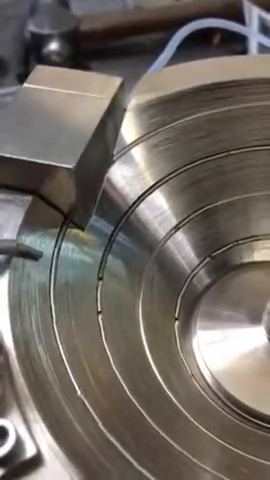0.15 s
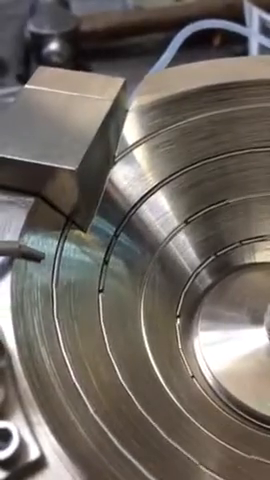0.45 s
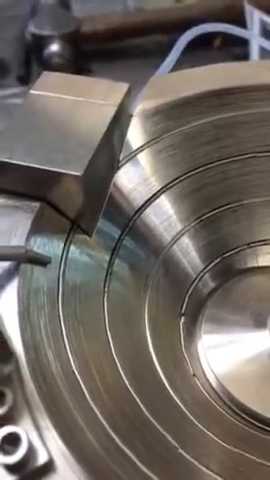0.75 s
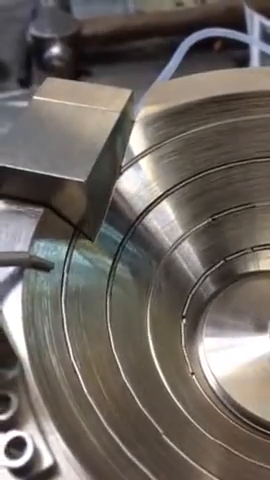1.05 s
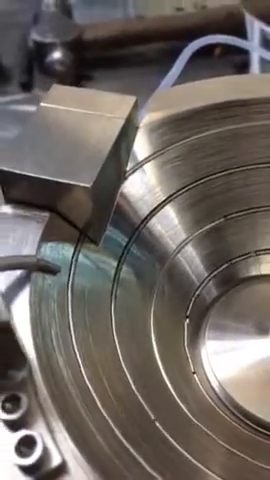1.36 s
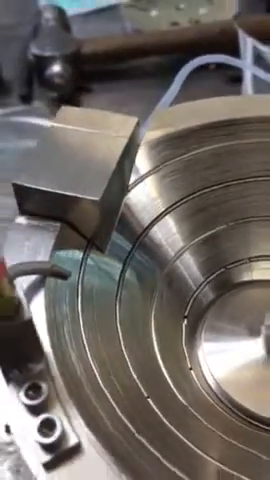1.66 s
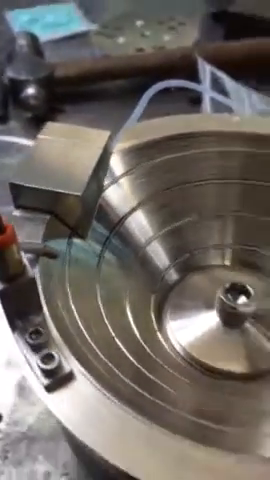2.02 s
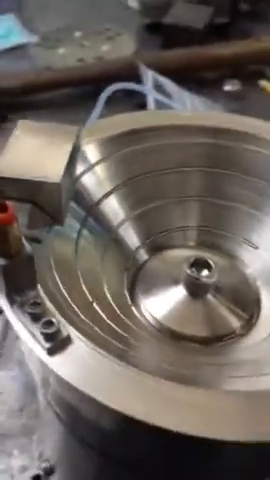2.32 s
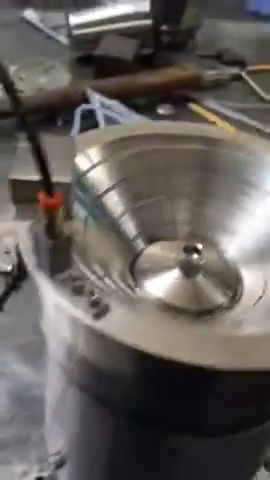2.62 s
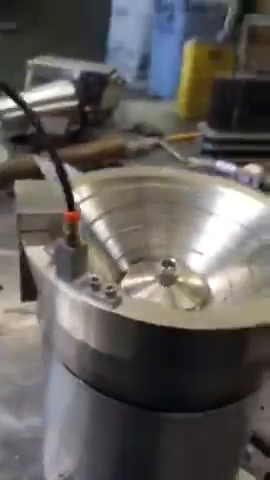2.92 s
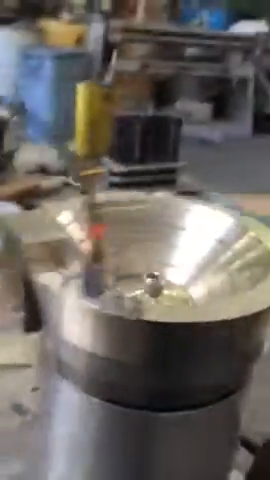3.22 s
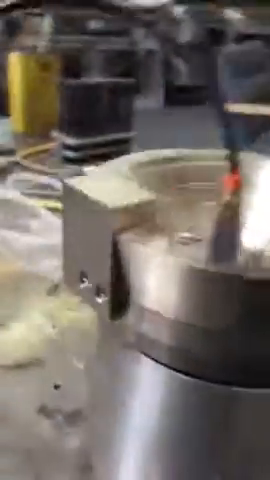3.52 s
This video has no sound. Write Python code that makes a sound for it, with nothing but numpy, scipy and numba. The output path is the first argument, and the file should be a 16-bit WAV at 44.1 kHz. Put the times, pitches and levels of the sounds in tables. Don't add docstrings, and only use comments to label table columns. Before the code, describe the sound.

Bright compressed-air hiss runs throughout over a low mains hum from a vibrating steel bowl; the handheld phone starts close, backs away and turns, with faint knocks and a shoe scuff near three seconds.

```python
import sys
import numpy as np
from scipy import signal
from scipy.fft import rfft, irfft, next_fast_len
from scipy.io import wavfile
from scipy.ndimage import uniform_filter1d, map_coordinates
from numba import njit

SR = 44100
rng = np.random.default_rng(int(sys.argv[2]) if len(sys.argv) > 2 else 0)


def master(y):
    cut = np.clip(np.atleast_2d(y).T, -1, 1)
    pcm = np.round(cut * 32767)
    wavfile.write(sys.argv[1], SR, pcm.astype(np.int16))


def decibels_to_gain(level_db):
    exponent = np.asarray(level_db, float) / 20
    return 10 ** exponent


N = 162288

# (centre [Hz], width [Hz], level [dB])
FACING_MODES = [(2250, 260, -19.5), (2740, 770, -19), (3160, 360, -18), (4324, 940, -10.5),
                (5390, 780, -9.5), (5960, 890, -14.5), (7420, 1470, -6), (8700, 570, -8.5), (9560, 670, -4),
                (10320, 310, -7), (11820, 1270, 2), (13170, 1750, -1), (14460, 1050, 1), (15400, 1500, -7)]
# (centre [Hz], width [Hz], level [dB])
BACKED_MODES = [(2640, 490, -14), (3330, 810, -16.5), (4000, 620, -26), (5240, 930, -8), (6300, 2400, -14),
                (7400, 1900, -13), (8580, 530, -5.5), (9430, 840, -5), (10140, 420, -12), (11740, 1050, 0),
                (12630, 1760, 0.5), (14200, 890, 1), (15400, 1300, -6)]
# (centre [Hz], width [Hz], level [dB])
SIDE_MODES = [(2070, 1800, -21), (2890, 890, -11), (4150, 1220, -5.5), (5200, 1040, -2), (6090, 500, -7.5),
              (7600, 1660, -3), (8700, 1200, -4), (9600, 600, 0.5), (10400, 610, 0), (11260, 370, -3),
              (12400, 1270, -0.5), (13900, 1400, -5.5), (15200, 1800, -8.5)]
# (time [s], facing jet [dB], backed jet [dB], side jet [dB])
PHONE_PATH = [(0, -35.5, -51, -51), (1.6, -36.5, -40.5, -53), (1.9, -37.5, -41.5, -60),
              (2.2, -43, -40.5, -47), (2.45, -44, -38.5, -49.5), (2.75, -57, -38.5, -47.5),
              (2.95, -57, -40, -44), (3.05, -65, -42.5, -44), (3.14, -65, -57, -42.5), (3.3, -71, -47, -43),
              (3.5, -69, -50, -43), (3.68, -61.5, -64, -42)]
# (time [s], lag [ms])
FLANK_LAG = [(1.8, 0.4), (2.5, 0.49), (3.0, 0.57), (3.35, 0.945), (3.68, 0.78)]
# (time [s], centre [Hz], depth [0-1])
RIM_DIP = [(0, 3490, 0.77), (1.6, 3520, .8), (1.85, 3620, .75), (2.0, 3750, .6), (2.15, 3850, 0.6),
           (2.3, 3950, 0.45), (2.55, 3900, .2), (2.7, 3600, 0.4), (3.0, 3450, .4), (3.45, 3050, 0.3),
           (3.68, 3300, 0.1)]
# (time [s], centre [Hz], depth [0-1])
BENCH_DIP = [(1.7, 4350, 0.02), (1.9, 4280, 0.25), (2.2, 4430, 0.7), (2.6, 4570, 0.25), (3.2, 4620, 0.34),
             (3.68, 4930, 0.7)]
# (time [s], centre [Hz], depth [0-1])
SHADE_DIP = [(2.7, 14300, 0), (2.9, 14200, .3), (3.06, 14600, .5), (3.35, 14600, .45), (3.46, 15400, 0.3),
             (3.68, 15000, .5)]
# (time [s], centre [Hz], depth [0-1])
HOLDER_DIP = [(2.2, 7900, 0.03), (2.5, 7900, 0.4), (2.8, 7600, 0.1), (3.1, 7700, 0.3), (3.36, 8700, 0.46),
              (3.43, 9200, 0), (3.52, 12400, .2), (3.68, 12300, 0.6)]
# (time [s], centre [Hz], depth [0-1])
LIP_DIP = [(1.6, 6350, 0), (1.95, 6420, .55), (2.2, 6600, .45), (2.35, 6900, .2), (2.6, 6300, 0),
           (2.75, 6400, .35), (3.1, 6900, .35), (3.4, 6500, .3), (3.68, 6600, .2)]
# (time [s], centre [Hz], depth [1, under 0 lifts])
HOLLOW_LIFT = [(2.85, 3800, 0.021), (3.05, 3950, -0.23), (3.25, 4200, -0.36), (3.4, 4450, -0.41),
               (3.52, 4200, 0), (3.6, 4000, .4), (3.68, 4000, .4)]
# (time [s], centre [Hz], depth [1, under 0 lifts])
EDGE_DIP = [(2.85, 13800, 0), (3.03, 13800, .7), (3.17, 13700, .75), (3.25, 13900, .2), (3.4, 13250, .6),
            (3.5, 14000, .1), (3.56, 14500, .6), (3.68, 14800, .7)]
# (time [s], centre [Hz], depth [1, under 0 lifts])
WALL_GLANCE = [(2.75, 11900, 0), (2.9, 12100, -.3), (3.05, 12300, -.2), (3.2, 12000, 0.15), (3.3, 11200, 0),
               (3.4, 11100, -.6), (3.5, 11200, -.3), (3.6, 11300, 0)]
# (multiple of mains [1], level [dB rms], loss per dB of distance loss [dB])
DRIVE_LINES = [(1.014, -77.5, -1.5), (1.995, -45.5, 1.3), (4.01, -61, 0.2), (6, -62, 3), (7.95, -76.5, 5),
               (9.97, -77.5, 1.5), (12, -90, -4.5), (13.9, -75.5, 4.5), (16, -85, 3), (18, -78, 4.5),
               (21.9, -81, -1.5), (22.93, -85, 5), (23.44, -83, -1.5)]
# (time [s], level [dB])
DRIVE_FALL = [(0, -1), (1.5, -0.5), (2.3, -1.25), (2.9, -1.1), (3.2, -2.1), (3.68, -2.5)]
# (frequency [Hz], level [dB per Hz])
RUMBLE = [(22, 7), (45, -10.5), (100, 2.5), (200, -10), (450, -12.5), (900, -15), (1400, -13), (2200, -6)]
# (time [s], level [dB], pitch [Hz], t60 [s])
KNOCK_EVENTS = [
    (2.32, -56, 1307, 0.12),
    (2.61, -52, 1770, 0.08),
    (2.61, -60, 1270, 0.056),
    (2.62, -54, 2250, .06),
    (2.722, -55, 374, 0.1),
    (2.725, -62, 1230, .12),
    (3.495, -62, 454, 0.066),
    (3.53, -60, 1290, .04),
    (3.65, -62, 890, 0.07),
]
# (time [s], level [dB], centre [Hz], t60 [s])
SCUFF_EVENTS = [
    (2.605, -67, 1400, 0.16),
    (2.716, -71.5, 705, 0.29),
    (2.72, -69, 1490, .25),
    (3.03, -63, 327, .3),
    (3.1, -66, 400, 0.2),
    (3.525, -66, 650, 0.093),
    (3.528, -74, 1300, 0.074),
    (3.645, -69, 805, 0.2),
]
# (time [s], level
# [dB], pitch [Hz], t60 [s])
SLIP_EVENTS = [(2.716, -50, 788, .08), (2.722, -49, 1940, .06), (2.722, -49, 2090, .06),
               (2.775, -55, 900, .08), (2.81, -53, 637, 0.08), (2.955, -49, 151, .1),
               (2.945, -44, 525, 0.055), (2.975, -50, 820, 0.089), (2.9821, -53, 240, 0.45),
               (3.018, -46, 273, 0.08), (3.03, -45.5, 318, 0.057), (3.035, -49, 440, .06),
               (3.035, -66, 696, .08), (3.052, -45, 510, 0.078), (3.08, -43, 410, 0.093),
               (3.04, -54.5, 1490, 0.27), (3.045, -57, 1760, 0.17), (3.09, -54, 480, 0.056),
               (3.112, -44, 410, 0.1), (3.125, -56, 650, .06), (3.138, -44.5, 412, 0.12),
               (3.15, -47, 690, 0.08), (3.178, -41.5, 433, 0.079), (3.19, -43.5, 635, .09),
               (3.255, -56, 473, .08), (3.308, -49.5, 460, 0.074), (3.495, -48, 246, 0.089),
               (3.526, -46, 870, 0.038), (3.533, -51, 410, .06), (3.635, -50, 1634, 0.13),
               (3.658, -51, 1360, .08)]
# (frequency [Hz], t60 [s], level [dB])
SOLE_MODES = [(174, .08, -6.5), (262, 0.048, -9), (410, 0.086, -10), (507, 0.11, -8), (674, 0.03, -5.5),
              (820, 0.015, -10), (1110, 0.027, -23), (1470, 0.017, -9), (1730, 0.032, -7.5),
              (2110, 0.012, -12), (2820, 0.033, -11)]
# (time [s], level [dB])
SOLE_DRAG = [(2.74, -93), (2.8, -66), (2.9, -60.5), (2.96, -60), (3.05, -55), (3.12, -65), (3.2, -58),
             (3.24, -63), (3.33, -65), (3.4, -78)]
# (time [s], low edge [Hz], high edge [Hz], level [dB])
SIDE_BURSTS = [(.894, 4150, 5150, -59), (2.102, 5200, 6450, -56), (2.1, 6900, 8960, -50),
               (2.472, 5700, 6940, -58), (2.75, 4700, 6260, -54), (2.89, 4630, 5800, -55),
               (2.891, 9000, 10400, -51)]

FLUTTER_DB, TURN_FLUTTER_DB, GUST_DB = 0.5, 1.1, 0.2
BENCH_DB, BENCH_T60_S, FLANK_DB = -12, 0.05, -17
MAINS_HZ = 59.98
DRIVE_SKEW_RAD, DRIVE_OFFSET_RAD = 0.22, -1.75
SHOP_DB, SHOP_TOP_HZ = -63, 2460
SHAFT_HZ, SHAFT_WIDTH_HZ, SHAFT_DB, SHAFT_LINE_DB = 40.5, 3, -80, -72
MAINS_SWAY_DB = -73.5
STRIKE_RISE_S = 0.006
SLIPS_PER_S, SLIP_SPREAD_DB = 600, 1.5
BURST_S = 1024 / SR
PHONE_TOP_HZ = 15725


def level(x, db):
    return x * decibels_to_gain(db) / np.sqrt(np.mean(x ** 2))


def coloured(power):
    size = next_fast_len(N)
    hz = np.arange(size // 2 + 1) * SR / size + 1e-3
    spectrum = rfft(rng.standard_normal(size)) * np.sqrt(power(hz))
    return level(irfft(spectrum, size)[:N], 0)


def walk(rate_hz):
    hold = int(SR / rate_hz)
    steps = np.repeat(rng.standard_normal(N // 200), hold)[:N]
    slewed = uniform_filter1d(uniform_filter1d(steps, hold), hold)
    return slewed / slewed.std()


def ring(x, hz, t60_s):
    pole = np.exp(2j * np.pi * hz / SR - np.log(1000) / (t60_s * SR))
    return signal.lfilter([1], [1, -pole], x).imag


@njit
def band(x, hz, width_hz):
    y, mid, low = np.empty(len(x)), 0., 0.
    for i in range(len(x)):
        g, damping = np.tan(np.pi * hz[i] / SR), width_hz / hz[i]
        v = (mid + g * (x[i] - low)) / (1 + g * (g + damping))
        mid, low, y[i] = 2 * v - mid, low + 2 * g * v, damping * v
    return y


def dip(x, rows, width_hz):
    s, hz, depth = np.array(rows).T
    t = np.arange(N) / SR
    share = np.clip(np.interp(t, s, depth), -1, 1)
    return x - share * band(x, np.interp(t, s, hz), 1. * width_hz)


def path_gain(column):
    rows = np.array(PHONE_PATH)
    return decibels_to_gain(np.interp(np.arange(N) / SR, rows[:, 0], rows[:, column]))


def jet(modes, flutter_db):
    air = np.zeros(N)
    for hz, width_hz, db in modes:
        gain = decibels_to_gain(db + flutter_db * walk(6.94)) * np.sqrt(width_hz)
        air += gain * coloured(lambda f: 1 / (1 + (2 * (f - hz) / width_hz) ** 2) ** 2)
    age = np.arange(2048) / SR
    echoes = rng.standard_normal(len(age)) * decibels_to_gain(-60 * age / BENCH_T60_S) * (age > 0.002)
    echoes /= np.linalg.norm(echoes)
    return level(air + decibels_to_gain(BENCH_DB) * signal.fftconvolve(air, echoes)[:N], 0)


def nozzle():
    t = np.arange(N) / SR
    moving = path_gain(2) * jet(BACKED_MODES, FLUTTER_DB) + path_gain(3) * jet(SIDE_MODES, TURN_FLUTTER_DB)
    lag_s = np.interp(t, *np.array(FLANK_LAG).T) / 1000
    flank = map_coordinates(moving, [(t - lag_s) * SR], mode="mirror")
    gust = decibels_to_gain(GUST_DB * walk(5.88))
    facing = path_gain(1) * jet(FACING_MODES, FLUTTER_DB)
    air = gust * (facing + moving + decibels_to_gain(FLANK_DB) * flank)
    air = dip(air, RIM_DIP, width_hz=420)
    air = dip(air, BENCH_DIP, width_hz=610)
    air = dip(air, SHADE_DIP, width_hz=3000)
    air = dip(air, HOLDER_DIP, width_hz=1300)
    air = dip(air, LIP_DIP, width_hz=270)
    air = dip(air, HOLLOW_LIFT, width_hz=450)
    air = dip(air, EDGE_DIP, width_hz=450)
    return dip(air, WALL_GLANCE, width_hz=700)


def drive():
    t = np.arange(N) / SR
    mains_phase = 2 * np.pi * MAINS_HZ * t
    fall_db = np.interp(t, *np.array(DRIVE_FALL).T)
    hum = np.zeros(N)
    for multiple, db, share in DRIVE_LINES:
        k = round(multiple)
        gain = np.sqrt(2) * decibels_to_gain(db + fall_db * share + 0.61 * walk(4.77))
        hum += gain * np.cos(k * mains_phase + DRIVE_SKEW_RAD * k ** 2 + DRIVE_OFFSET_RAD)
    return hum


def shop():
    hz, db = np.array(RUMBLE).T

    def rumble_power(f):
        shape = decibels_to_gain(2 * np.interp(np.log(f), np.log(hz), db))
        high_pass = (f / 20) ** 4 / (1 + (f / 20) ** 4)
        return shape * high_pass / (1 + (f / SHOP_TOP_HZ) ** 8)

    rumble = coloured(rumble_power)
    shaft = coloured(lambda f: 1 / (1 + (2 * (f - SHAFT_HZ) / SHAFT_WIDTH_HZ) ** 2) ** 2)
    swell = decibels_to_gain(0.5 * walk(6))
    line = np.sqrt(2) * decibels_to_gain(SHAFT_LINE_DB) * np.sin(2 * np.pi * SHAFT_HZ * np.arange(N) / SR)
    sway = level(ring(ring(rumble, 61, 0.8), 61, 0.8), 0)
    return level(rumble * swell, SHOP_DB) + decibels_to_gain(SHAFT_DB) * shaft + line + decibels_to_gain(MAINS_SWAY_DB) * sway


def strikes(rows, noise_share):
    out, t = np.zeros(N), np.arange(N) / SR
    noise = rng.standard_normal(N)
    for s, db, hz, t60_s in rows:
        age = np.clip(t - s, 0, 1)
        crack = level(band(noise, np.full(N, 1. * hz), 1. * hz), 0)
        envelope = decibels_to_gain(db - 60 * age / t60_s) * (1 - np.exp(-age / STRIKE_RISE_S))
        out += envelope * (np.sin(2 * np.pi * hz * age) + noise_share * crack)
    return out


def knocks():
    return strikes(KNOCK_EVENTS, noise_share=0.8)


def scuffs():
    return strikes(SCUFF_EVENTS, noise_share=4)


def strong_slips():
    return strikes(SLIP_EVENTS, noise_share=0.3)


def sole_drag():
    slips = rng.random(N) < SLIPS_PER_S / SR
    rub = np.zeros(N)
    for hz, t60_s, db in SOLE_MODES:
        kicks = slips * decibels_to_gain(SLIP_SPREAD_DB * rng.standard_normal(N)) * rng.standard_normal(N)
        rub += decibels_to_gain(db) * level(ring(kicks, hz, t60_s), 0)
    s, db = np.array(SOLE_DRAG).T
    return level(rub, 0) * decibels_to_gain(np.interp(np.arange(N) / SR, s, db, left=-140, right=-140))


def scene():
    mono = nozzle() + drive() + shop() + sole_drag() + knocks() + strong_slips() + scuffs()
    return np.array([mono, mono])


def side_bursts():
    t = np.arange(N) / SR
    side = np.zeros(N)
    for s, low_hz, high_hz, db in SIDE_BURSTS:
        window = np.cos(np.pi / 2 * np.clip((t - s) / BURST_S, -1, 1)) ** 2
        side += decibels_to_gain(db) * window * coloured(lambda f: (f > low_hz) & (f < high_hz))
    return side * np.array([[1], [-1]])


def top_cut(x):
    return signal.sosfilt(signal.butter(12, 16910, fs=SR, output="sos"), x)


def record(dry):
    low_pass = signal.ellip(14, 0.2, 75, PHONE_TOP_HZ, fs=SR, output="sos")
    mix = signal.sosfilt(low_pass, dry) + side_bursts()
    return top_cut(mix)


dry = scene()
out = record(dry)
master(out)
```